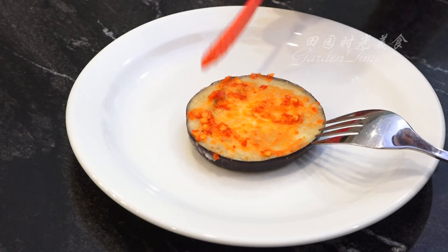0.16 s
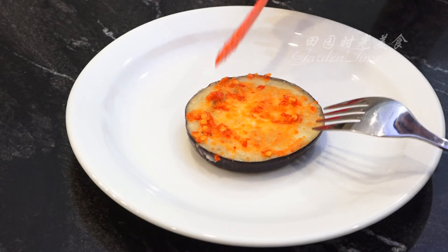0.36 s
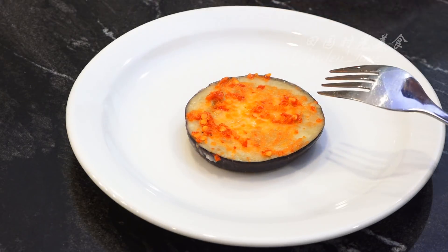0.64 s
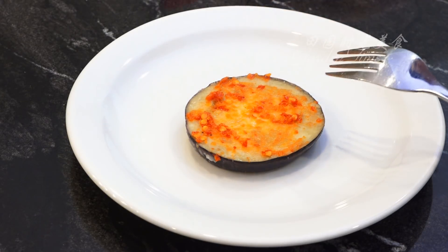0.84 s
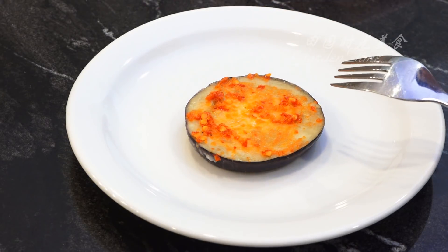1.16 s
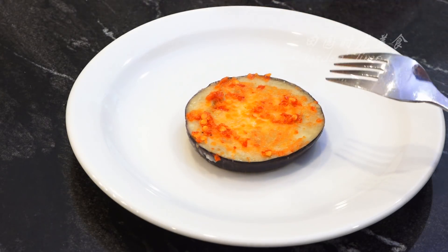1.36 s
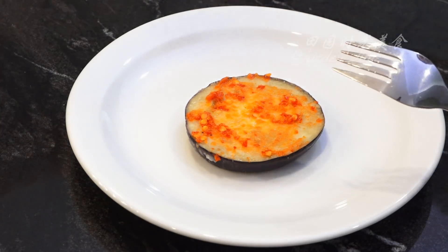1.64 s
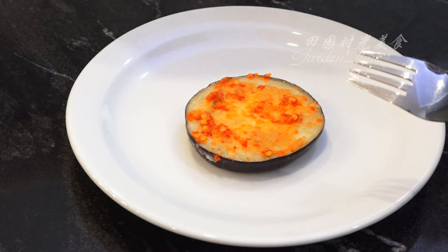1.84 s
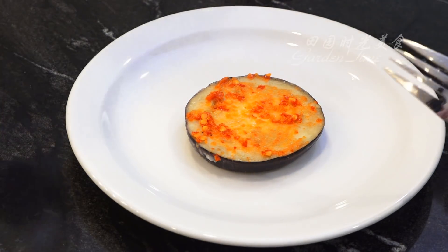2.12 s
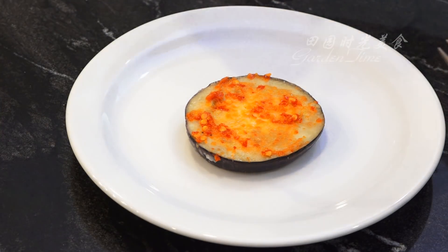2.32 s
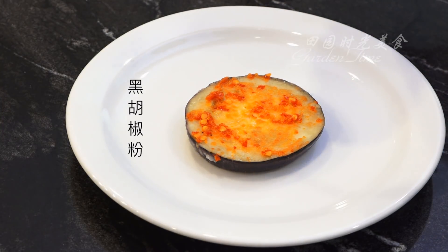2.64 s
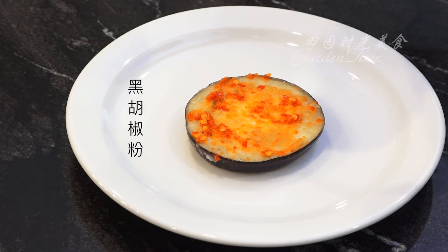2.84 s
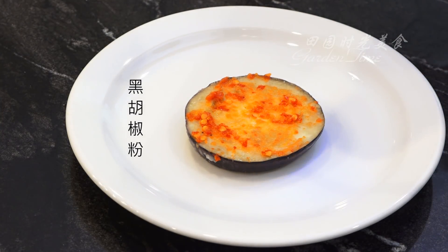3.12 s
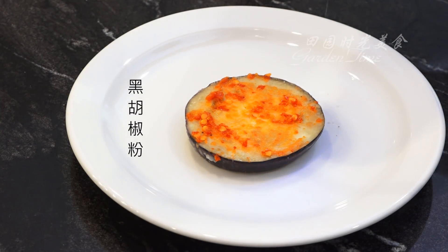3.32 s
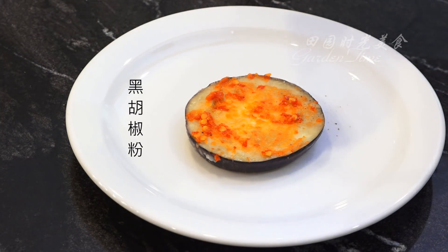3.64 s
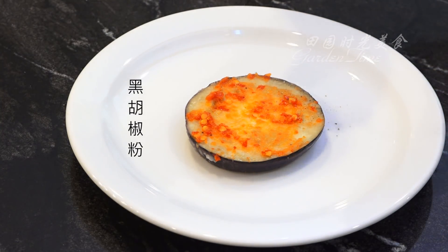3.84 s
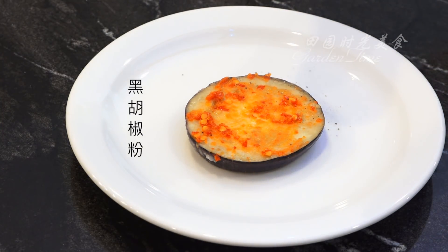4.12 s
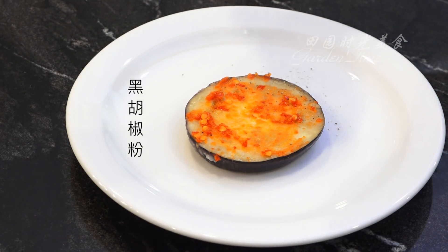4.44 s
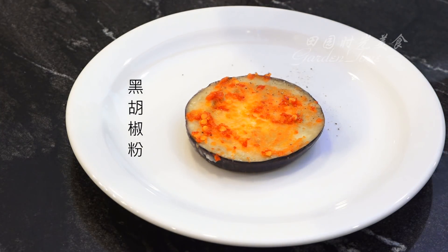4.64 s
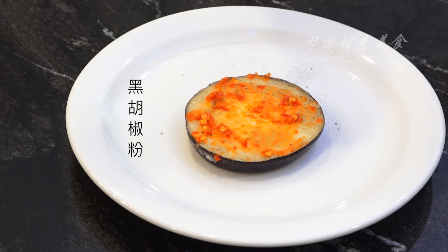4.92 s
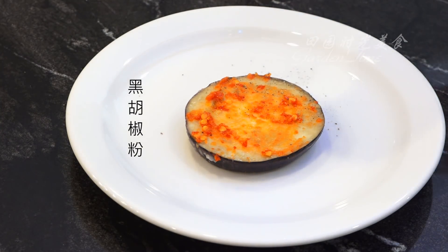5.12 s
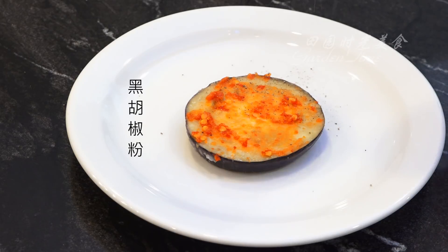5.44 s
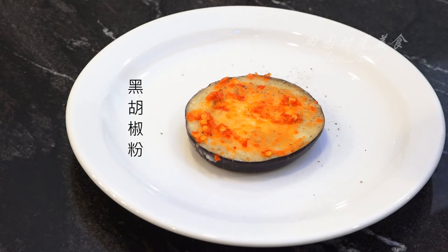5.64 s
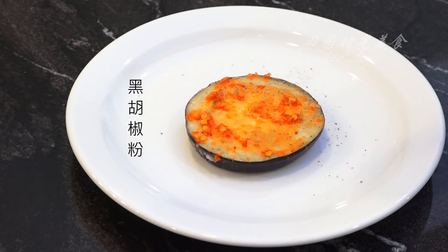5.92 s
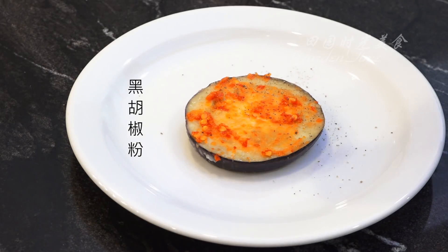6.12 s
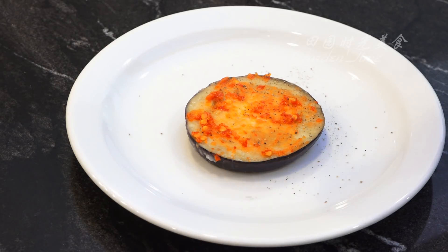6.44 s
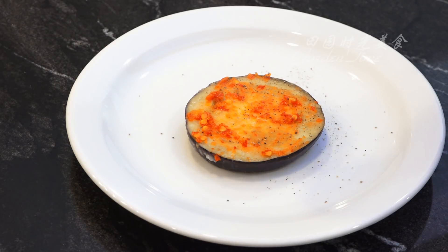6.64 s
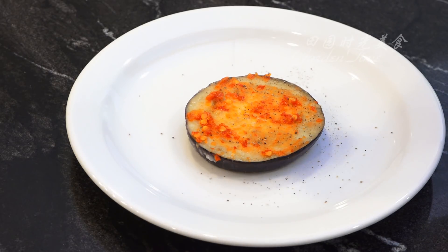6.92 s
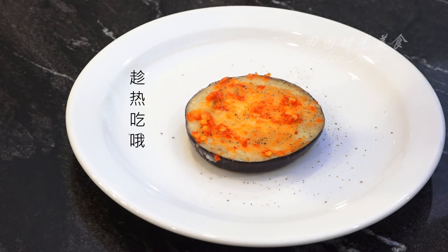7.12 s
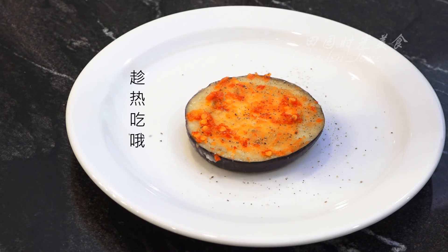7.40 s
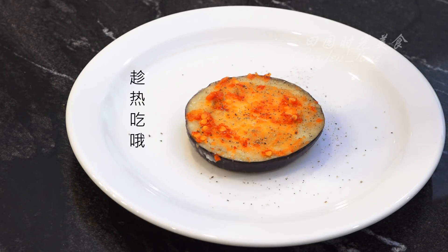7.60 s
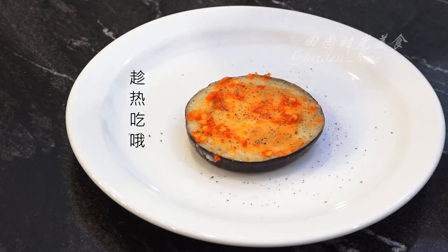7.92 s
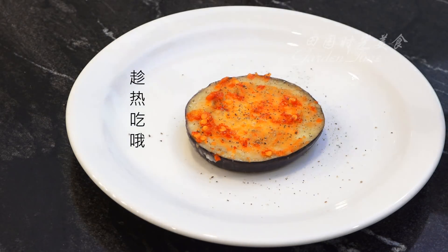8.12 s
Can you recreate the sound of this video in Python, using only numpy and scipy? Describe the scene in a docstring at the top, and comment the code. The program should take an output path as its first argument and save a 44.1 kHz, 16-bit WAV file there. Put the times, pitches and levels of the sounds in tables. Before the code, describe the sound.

A close stereo microphone in a small, lightly reverberant kitchen, with a faint steady wash of distant appliances and a weak low hum early on. Three hard, clicky spatula taps fall between 0 and 0.4 seconds. From 0.9 to 1.3 a fork clinks brightly on a china plate in an irregular cluster, tines chattering and dragging briefly. At 1.9 a soft low thud, then hand brushing and light peppercorn ticks until 2.4. A switch clicks at 3.0 and an electric mill spins up at once: a mid-low motor whine, rough throbbing gears, resonant plastic-like buzz and dense, crunchy grit. The pitch sags notably around 4.2, recovers and keeps wavering; grinding grows fuller after 5.4. One sharp loud crack at 6.9. Near 7.8 it runs down within a moment and stops. Small clicks at 8.1 to 8.25.

```python
"""Pepper mill on a kitchen counter

A small stereo microphone stands close by. A spatula taps three times, a fork clinks and drags on a plate.
A pepper mill is picked up with a thud and a rattle; its geared motor grinds for five seconds and runs down.
Hard contacts are noisy clicks and decaying sines, the motor is tones that follow its speed, the grit is
random cracks. The room answers with a short tail over a faint floor of far appliances.
"""
import sys
import numpy as np
from scipy import signal
from scipy.fft import rfft, irfft, next_fast_len
from scipy.io import wavfile

SR = 44100
rng = np.random.default_rng(int(sys.argv[2]) if len(sys.argv) > 2 else 0)


def inscribe(sig):
    """Save sig as 16-bit PCM at rate SR to the path in sys.argv[1].

    A 1-D sig is mono; a 2-D sig holds one channel per row.
    Samples are clipped to [-1, 1] before scaling.
    """
    pcm = np.round(np.clip(np.atleast_2d(sig).T, -1, 1) * 32767)
    wavfile.write(sys.argv[1], SR, pcm.astype(np.int16))


N = 364707
TIME = np.arange(N) / SR
SIZE = next_fast_len(N + SR)   # transform length, with room for the tail
HZ = np.maximum(np.arange(SIZE // 2 + 1) * SR / SIZE, 1)


def amp(db):
    """Gain of a level in dB."""
    return 10 ** (np.asarray(db) / 20)


def rms_one(x):
    """Scaled to rms 1."""
    return x / np.sqrt(np.mean(x ** 2) + 1e-20)


def in_time(rows):
    """Columns joined by straight lines in time."""
    s, *columns = np.transpose(rows)
    return [np.interp(TIME, s, c) for c in columns]


def at_hz(points, hz=HZ):
    """A table read on a log-frequency axis."""
    table = np.array(points)
    return np.interp(np.log(hz), np.log(np.maximum(table[:, 0], 1)), table[:, 1])


def shape(x, gain):
    """Filter by a gain per frequency."""
    return irfft(rfft(x, SIZE) * gain, SIZE)[..., :N]


def band(x, low_hz, high_hz, order=2):
    """Butterworth band-pass."""
    return signal.sosfilt(signal.butter(order, [low_hz, high_hz], "band", fs=SR, output="sos"), x)


def stereo(mid, side, alike):
    """Two ports whose likeness is set by how much of the side signal they hold in opposite sign."""
    return np.sqrt(1 + alike) * mid + np.sqrt(1 - alike) * side * [[1], [-1]]


def drift(rate):
    """Slow random wander of rms 1, low-passed at a rate in Hz and made at an eighth of the sample rate."""
    r = np.exp(-16 * np.pi * rate / SR)
    noise = rng.standard_normal(N // 8 + 4002)
    slow = signal.lfilter([1], [1, -2 * r, r * r], noise)[4000:]
    return np.interp(np.arange(N) / 8, np.arange(len(slow)), rms_one(slow))


def rough_tone(phase, rate):
    """A tone whose size and phase wander at random."""
    return drift(rate) * np.sin(phase) + drift(rate) * np.cos(phase)


def ring(impulses, hz, t60):
    """A resonance: a unit click sets a decaying sine of starting height 1 ringing."""
    r, w = amp(-60 / (t60 * SR)), 2 * np.pi * hz / SR
    return signal.lfilter([0, np.sin(w)], [1, -2 * r * np.cos(w), r * r], impulses + 1e-18)


def strike(times, db, modes, spread_db):
    """Every blow drives every mode of a body with a strength of its own."""
    at, out = np.round(np.asarray(times) * SR).astype(int), 0
    luck = rng.normal(0, spread_db, (len(at), len(modes)))
    for k, (hz, mode_db, t60) in enumerate(modes):
        impulses = np.zeros(N)
        impulses[at] = amp(db + mode_db + luck[:, k])
        out = out + ring(impulses, hz, t60)
    return out


def grains(per_s, uneven_db):
    """Random clicks of uneven size and either sign; rms 1."""
    sizes = amp(uneven_db * np.minimum(rng.exponential(1, N), 5)) * rng.choice([-1, 1], N)
    return rms_one(sizes * (rng.random(N) < per_s / SR))


def knocks(rows):
    """Each contact is a few cycles at its own pitch, a spit of noise and a short low knock."""
    top, low, t = np.zeros(N + 600), np.zeros(N + 600), np.arange(600) / SR
    spit = rng.standard_normal((len(rows), 2, len(t)))
    for (s, db, hz, knock_db), noise in zip(rows, spit):
        at = slice(round(s * SR), round(s * SR) + len(t))
        cycles = .5 * np.sin(2 * np.pi * hz * t) * np.exp(-t / 0.0008)
        top[at] += amp(db) * (cycles + 0.66 * noise[0] * np.exp(-t / 0.0017))
        body = np.sin(2 * np.pi * 1000 * t) + 0.37 * np.sin(2 * np.pi * 520 * t) + 3.9 * noise[1]
        low[at] += amp(knock_db) * body * np.exp(-t / 0.0011)
    return band(top[:N], 2700, 10500, order=4) + band(low[:N], 380, 2200)


def floor_noise():
    """Wide steady noise, less alike at the two ports in the middle and the treble."""
    # Spectrum of the floor. Each row: frequency in Hz, relative density in dB per Hz.
    floor = [(18, -48), (30, -39), (117, -7.5), (174, -7.5), (221, -7), (582, -7.5), (630, -7.5), (718, -7),
             (1180, -6.5), (1280, -8.5), (1950, -11.5), (2960, -17.5), (4390, -9), (5710, -19),
             (15900, -26.5)]
    # Likeness of the two ports. Each row: frequency in Hz, left-right likeness (1 is the same).
    likeness = [(60, 0.99), (1000, 0.077), (5000, 0.29), (15000, 0.13)]
    mid, side = rfft(rng.standard_normal((2, N)), SIZE) * amp(at_hz(floor))
    noise = irfft(stereo(mid, side, at_hz(likeness)), SIZE)[:, :N]
    return rms_one(noise) * amp(-56)


def far_tones():
    """Faint narrow bands of noise that flicker."""
    # Flickering far tones. Each row: frequency in Hz, width in Hz, level in dB.
    whistles = [(3243, 140, -66), (4380, 82, -69.5), (1214, 6.2, -74)]
    out = 0
    for hz, width, db in whistles:
        tone = shape(rng.standard_normal(N), 1 / (1 + (2 * (HZ - hz) / width) ** 2))
        out = out + amp(db + 2.2 * drift(9)) * rms_one(tone)
    return out


def low_hum():
    """A wavering sine that swells slightly, then fades fast."""
    hum_hz, hum_db, swell_db_per_s, fade_db_per_s, stop_s = 191, -72.5, 0.5, 120, 2.5
    db = hum_db + swell_db_per_s * np.minimum(TIME, stop_s) - fade_db_per_s * np.maximum(TIME - stop_s, 0)
    wave = np.sin(2 * np.pi * hum_hz * TIME + 1.9 * drift(1.6))
    return np.sqrt(2) * amp(db + 2.0 * drift(3.9)) * wave


def background():
    """The far appliances: steady noise, flickering tones and a low hum, without any near source."""
    return floor_noise() + far_tones() + low_hum()


def room(x):
    """A tail of noise dying faster in the high treble, much alike at the two close ports."""
    # Decay of the room. Each row: frequency in Hz, time to fall 60 dB in seconds.
    room_t60 = [(200, 0.46), (1000, 0.74), (4000, 0.58), (10000, 0.4)]
    # Tone of the reflections. Each row: frequency in Hz, gain in dB.
    room_colour = [(200, 0.5), (600, -2), (1000, 1.5), (4000, -3), (10000, -6)]
    delay_s, likeness = 0.0057, 0.55
    t, tail = TIME[:SR * 3 // 4], 0
    for low in 125 * 2. ** np.arange(7):   # octave bands
        decay = amp(-60 * t / at_hz(room_t60, low * np.sqrt(2)))
        tail = tail + band(rng.standard_normal((2, len(t))), low, 2 * low) * decay
    tail = stereo(tail[0], tail[1], likeness) * np.clip((t - delay_s) / 0.002, 0, 1)
    tail = tail / np.sqrt(np.mean(np.sum(tail ** 2, axis=1)))   # mean energy of the ports is 1
    return shape(x, amp(at_hz(room_colour)) * rfft(tail, SIZE))


def spatula_taps():
    """Three hard taps, each a short pitched click over a low knock."""
    # Spatula taps. Each row: start in seconds, click level in dB, pitch in Hz, knock level in dB.
    taps = [(0.0264, -20.5, 3870, -27.5), (0.1903, -23.5, 2900, -25.5), (0.349, -16.5, 3650, -25.5)]
    return knocks(taps)


def fork_on_plate():
    """Clinks ring plate and fork with a crack; between them the tines chatter over the glaze."""
    # Fork clinks. Each row: start in seconds, then drive of plate, fork neck and tines in dB.
    clinks = [(0.9268, -11.5, -57, -57), (0.9347, -16, -52, -46), (0.9961, -29, -45, -31),
              (1.0128, -19, -33, -34), (1.0396, -23, -33, -34), (1.081, -18.5, -54, -28),
              (1.1678, -19, -58, -29.5), (1.1958, -26, -55, -28.5), (1.2107, -26, -48, -41)]
    # Modes of the plate. Each row: frequency in Hz, relative level in dB, time to fall 60 dB in seconds.
    plate = [(5566, 1, .05), (5624, -11, .2), (5657, -9.5, .42), (5782, -3, .04), (6891, -13, .02),
             (7849, -13, .02), (10470, -11, .07), (10700, -16, .04), (3564, -18, .04), (1098, -22, .1),
             (646, -25, .15), (1260, -28, .12)]
    # Modes of the fork neck, columns as for the plate.
    neck = [(3946, 0, .09), (4002, -6, .06)]
    # Modes of the tines, columns as for the plate.
    tines = [(4250, -3, .03), (5060, 0, .04)]
    s, plate_db, neck_db, tines_db = np.transpose(clinks)
    hits = strike(s, plate_db - 6, plate, spread_db=1.)
    hits = hits + strike(s, neck_db, neck, spread_db=1.) + strike(s, tines_db, tines, spread_db=1.)
    # each crack dies away from the latest clink
    latest = np.searchsorted(s, TIME)
    since = TIME - np.insert(s, 0, -1)[latest]
    crack_db = np.insert(plate_db, 0, -99)[latest] - 9.5
    crack = amp(crack_db) * np.exp(-since / 0.0099) * rng.standard_normal(N)
    # the drag sags steadily, then the tines lift off
    drag_s, drag_end_s, start_db, sag_db, lift_db_per_s = .931, 1.313, -48, 8.5, 240
    drag_db = start_db - sag_db * (TIME - drag_s) / (drag_end_s - drag_s)
    drag_db = drag_db - lift_db_per_s * np.maximum(TIME - drag_end_s, 0)
    chatter = (TIME > drag_s) * amp(drag_db) * grains(per_s=1500, uneven_db=-2.5)
    sliding = sum(amp(db - 29) * ring(chatter, hz, t60) for hz, db, t60 in plate)
    ringing = band(hits + sliding, 680, 12000, order=3)
    return ringing + band(crack, 5000, 9900, order=4) + amp(9.5) * band(chatter, 620, 5300)


def thud():
    """One blow sets the counter's low, short modes ringing."""
    # Modes of the counter. Each row: frequency in Hz, relative level in dB, time to fall 60 dB in seconds.
    counter = [(215, -8, .15), (250, -6, .24), (285, -5, .15), (340, -10, .12), (420, -11, .15),
               (510, -9, .15), (890, -16, .08), (1180, -19, .1)]
    return band(strike([1.924], -34.5, counter, spread_db=1.), 170, 2200, order=3)


def hand_brush():
    """A hand brushing the mill: dense grains that rise and fall with each stroke."""
    # Strokes. Each row: peak in seconds, level in dB, rise over 20 dB in seconds, fall over 20 dB in seconds.
    brushes = [(1.99, -53, 0.36, 0.1), (2.158, -54, 0.024, 0.2), (2.35, -49.5, 0.075, 0.17)]
    stroke = 0
    for s, db, rise, fall in brushes:
        stroke = stroke + amp(db - 20 * np.maximum((s - TIME) / rise, (TIME - s) / fall))
    return stroke * rms_one(band(grains(per_s=6400, uneven_db=3.5), 2350, 7900))


def handling_knocks():
    """The mill lifted off the counter, its switch clicked on and, after it has run down, three clicks as
    it is put aside."""
    # Handling. Each row: start in seconds, click level in dB, pitch in Hz, knock level in dB.
    handling = [(1.925, -40, 2520, -34), (3.001, -32, 3340, -44), (8.1097, -25, 8350, -53),
                (8.213, -23, 4230, -37), (8.2475, -34, 3690, -61)]
    return knocks(handling)


def peppercorns():
    """Corns ticking loose in the mill and one cracking in the burrs: light clicks with hardly a knock."""
    # Peppercorns. Each row: start in seconds, click level in dB, pitch in Hz.
    corns = [(1.9794, -33, 3220), (2.0085, -35, 4090), (2.1083, -34, 5350), (2.152, -43, 8000),
             (2.159, -38, 3000), (2.2363, -40, 6300), (2.312, -33, 4090), (2.3277, -32, 4050),
             (2.334, -25.5, 8750), (2.3429, -29, 5470), (2.3483, -25.5, 7950), (2.3804, -29, 8140),
             (6.8762, -6.5, 8190)]
    return knocks([(s, db, hz, db - 38) for s, db, hz in corns])


def motor_whine(hz, turn):
    """A wavering sine at the motor whine, fading as the motor slows below a knee."""
    top_db, knee_hz, fade_db_per_hz = -47.5, 462.7, 0.35
    db = top_db - fade_db_per_hz * np.maximum(knee_hz - hz, 0)
    return np.sqrt(2) * amp(db + 1.9 * drift(31)) * np.sin(turn + 0.35 * drift(9.4))


def gear_mesh(turn, shell):
    """Worn teeth blur each order of the mesh, which swells once a turn of the slower gear."""
    # Overtones of the mesh. Each row: multiple of the mesh frequency, relative level in dB.
    mesh_orders = [(2, 2.5), (3, -3), (4, -6), (5, -26)]
    mesh_ratio, throb_ratio = 2.52, .0525   # cycles per whine cycle
    swing_db = 8 + 2.5 * drift(1.5)
    throb = rms_one(amp(swing_db * np.sin(throb_ratio * turn + .6 * drift(2))))
    overtones = sum(amp(db) * rough_tone(k * mesh_ratio * turn, 84.0) for k, db in mesh_orders)
    steady = .9 * np.sin(mesh_ratio * turn + drift(25))
    mesh = throb * rms_one(rough_tone(mesh_ratio * turn, 80.) + steady)
    return mesh + amp(-2) * rms_one(shape(overtones, 0.35 + shell))


def shell_rings():
    """Fixed rough tones of the shell: three swell and fade, each with its own levels; thinner ones come and
    go at random."""
    # Three main rings, in Hz.
    ring_hz = [2100, 3270, 4817]
    # Their levels. Each row: time in seconds, then low, middle and high ring in dB.
    ring_levels = [(3.18, -32, -40.5, -38), (3.4, -48, -35, -36), (3.76, -45, -40, -43),
                   (4.47, -47, -40.5, -41), (4.77, -46, -36.5, -45), (5.15, -46, -62, -39),
                   (5.5, -36, -39.5, -48), (6.11, -32.5, -35.5, -38.5), (6.58, -41.5, -38.5, -33.5),
                   (7.15, -29.5, -37, -34.5), (7.8, -43.5, -42.5, -42)]
    # Thinner rings. Each row: frequency in Hz, level in dB that a random swing moves.
    high_rings = [(4250, -44.5), (5620, -45.5), (7100, -47), (9200, -47), (14300, -61)]
    out = 0
    for hz, db in zip(ring_hz, in_time(ring_levels)):
        out = out + amp(db) * rough_tone(2 * np.pi * hz * TIME, .057 * hz)
    for hz, db in high_rings:
        out = out + amp(db + 3.5 * drift(1.4)) * rough_tone(2 * np.pi * hz * TIME, .03 * hz)
    return out


def crushed_grit(grind_db, shell):
    """Dense cracks in patches of colour that come and go; the fine part has its own level."""
    # Spectrum of the grit. Each row: frequency in Hz, relative density in dB per Hz.
    grind = [(180, -69), (300, -45), (462, -13), (748, -14.5), (1210, 0), (1480, -1.5), (2060, -3),
             (2760, -5), (3300, -5.5), (4810, -6.5), (8890, -17.5), (10600, -20), (11800, -32),
             (14400, -26), (15900, -26)]
    # Fine grit. Each row: time in seconds, level in dB.
    fine = [(3.2, -34.5), (3.74, -32.5), (4.26, -35.5), (5.1, -33.5), (5.42, -30), (6.07, -31.5),
            (6.7, -30), (7.0, -33), (7.8, -32)]
    grit = rfft(grains(per_s=9000, uneven_db=2.5), SIZE) * amp(at_hz(grind)) * (1 + .7 * shell)
    coarse_part, fine_part, together = 0, 0, drift(21)
    spacing = np.log(15000 / 350) / 17
    for centre in np.geomspace(350, 15000, 18):
        window = np.clip(1 - np.abs(np.log(HZ / centre)) / spacing, 0, 1)   # triangle on log frequency
        patch = irfft(grit * window, SIZE)[:N] * amp(.8 * together + 1.5 * drift(2.5))
        if centre > 6000:
            fine_part = fine_part + patch
        else:
            coarse_part = coarse_part + patch
    return amp(grind_db) * rms_one(coarse_part) + amp(in_time(fine)[0]) * rms_one(fine_part)


def mill():
    """The load on the burrs swings the motor speed; whine, gear mesh and the level of rings and grit follow."""
    # Motor under load. Each row: time in seconds, whine in Hz at full spin, then at full spin
    # the gear mesh drive in dB and the coarse grinding level in dB.
    motor = [(3.2, 440, -36.5, -28.5), (3.45, 458.3, -33.5, -28), (3.7, 490.4, -32, -29.5),
             (3.85, 512.8, -36, -30.5), (4.0, 487, -30, -32), (4.14, 439.3, -34.5, -30.5),
             (4.23, 344.6, -42.5, -31), (4.42, 403.4, -36.5, -31.5), (4.58, 460.4, -37.5, -29.5),
             (4.95, 475.4, -32, -30), (5.3, 533, -38, -29.5), (5.39, 514.2, -32.5, -27.5),
             (5.47, 445, -29, -27), (5.66, 463.7, -31.5, -27.5), (5.89, 497.6, -31, -29),
             (6.04, 467.7, -32.5, -27), (6.62, 510, -31.5, -28), (6.86, 452, -31, -28),
             (7.09, 457.5, -31.5, -27.5), (7.22, 432.5, -32.5, -28), (7.56, 511.6, -34.5, -30.5),
             (7.8, 510, -39.5, -27)]
    # Resonances of the shell. Each row: frequency in Hz, width in Hz, relative level in dB.
    housing = [(2134, 196, -1), (3470, 94, -10.5), (4840, 150, -12), (5170, 57, -32.5), (7800, 650, -3),
               (9160, 2060, 8)]
    full_hz, mesh_db, grind_db = in_time(motor)
    # speed starts at a share and closes in; at the end it falls straight to a stall
    on_s, spin_up_s, start_share = 3.0, .065, .45
    off_s, run_down_s, stall_share = 7.809, .14, 0.41
    stall_s = off_s + run_down_s
    spin = 1 - (1 - start_share) * np.exp(-np.maximum(TIME - on_s, 0) / spin_up_s)
    spin = spin * np.interp(TIME, [off_s, stall_s], [1, stall_share])
    gate = np.interp(TIME, [on_s, on_s + .03, stall_s, stall_s + .008], [0, 1, 1, 0])
    # level lost as the spin drops, in dB per octave
    gear, crush = amp(13.5 * np.log2(spin)), amp(12.5 * np.log2(spin))
    hz = full_hz * spin
    turn = 2 * np.pi * np.cumsum(hz) / SR   # phase of the whine
    shell = np.abs(sum(amp(db) / (1 + 2j * (HZ - f) / width) for f, width, db in housing))
    mesh = amp(mesh_db) * gear_mesh(turn, shell)
    burrs = shell_rings() + crushed_grit(grind_db, shell)
    return gate * (motor_whine(hz, turn) + gear * mesh + crush * burrs)


def scene():
    """Near sources, their room tail and the floor."""
    utensils = spatula_taps() + fork_on_plate()
    handled = thud() + hand_brush() + handling_knocks() + peppercorns()
    near = utensils + handled + mill()
    return near + amp(-6.5) * room(near) + background()


def record(dry):
    """The two microphone ports differ by a small lead and lean; the top is cut steeply."""
    # Phase between the ports. Each row: frequency in Hz, lead of the left in radians.
    lead = [(0, 0), (340, 0.8), (1210, 0.9), (1890, 0.7), (5430, 0.0), (8350, -0.2), (10700, -0.45),
            (16200, -0.5)]
    # Level between the ports. Each row: frequency in Hz, left minus right in dB.
    lean = [(60, -1.5), (110, -1.0), (200, 0.5), (380, 0.5), (700, 1.0), (1290, 1.0), (2380, 1.0),
            (4400, 0.5), (8120, 0.0), (15000, 0.5)]
    # half of the difference goes to each port
    ports = (amp(at_hz(lean)) * np.exp(1j * at_hz(lead))) ** np.array([[.5], [-.5]])
    steep_cut = signal.cheby2(24, 70, 16050, fs=SR, output="sos")   # 70 dB down from 16050 Hz
    return signal.sosfilt(steep_cut, shape(dry, ports))


dry = scene()
out = record(dry)
inscribe(out)
```